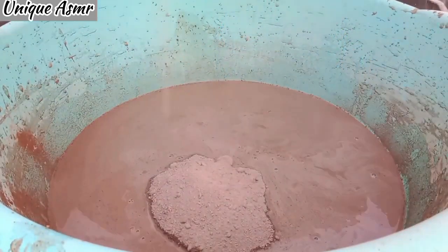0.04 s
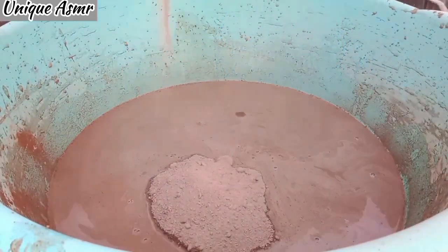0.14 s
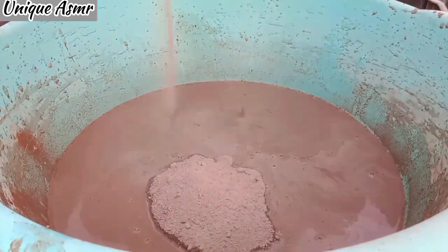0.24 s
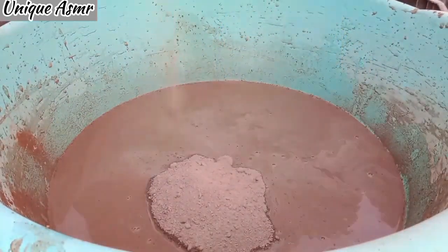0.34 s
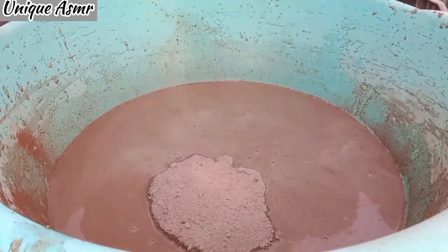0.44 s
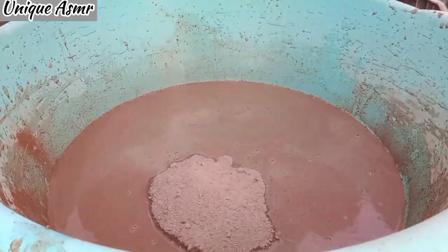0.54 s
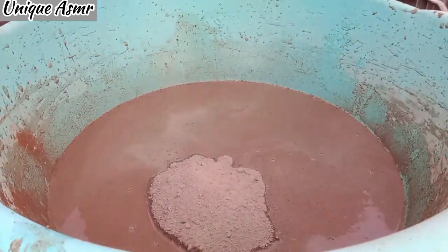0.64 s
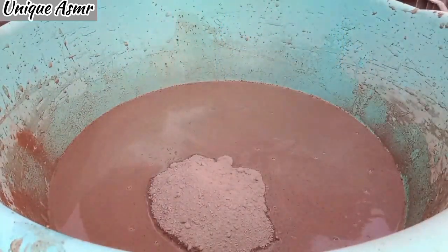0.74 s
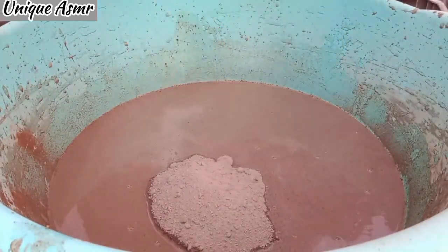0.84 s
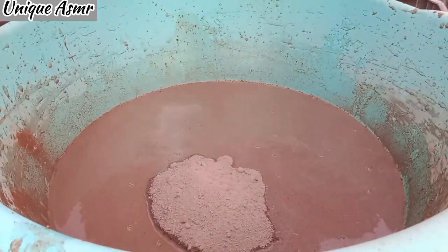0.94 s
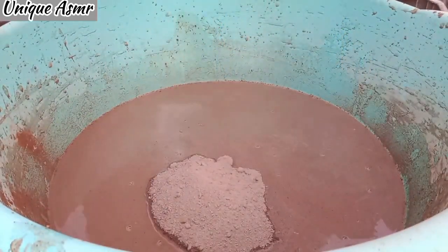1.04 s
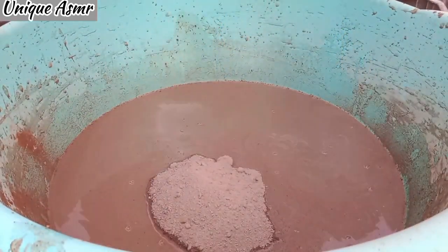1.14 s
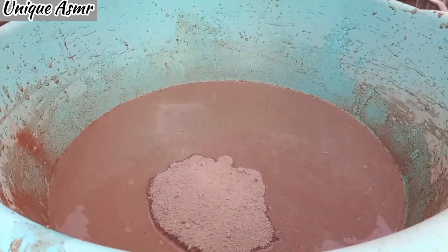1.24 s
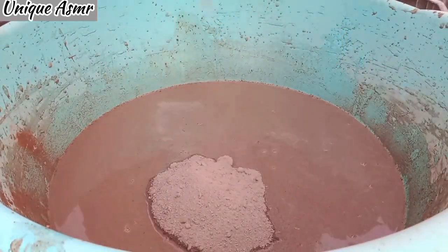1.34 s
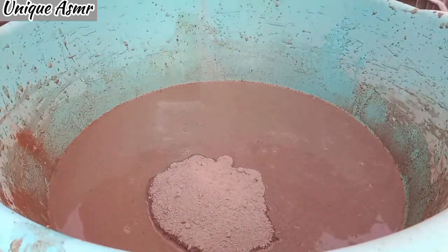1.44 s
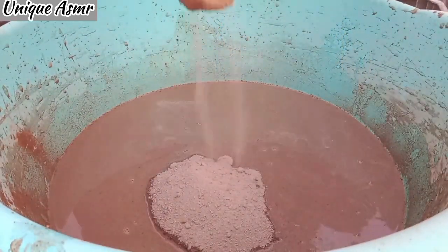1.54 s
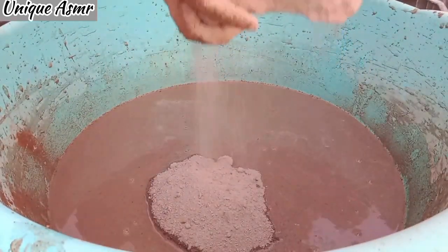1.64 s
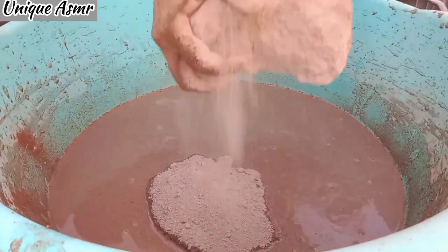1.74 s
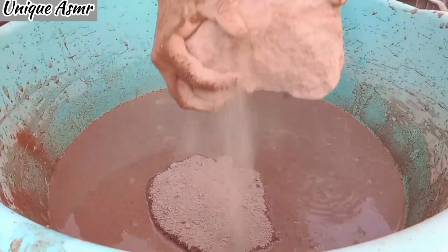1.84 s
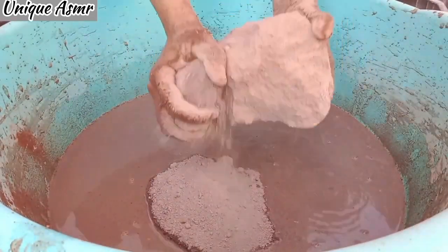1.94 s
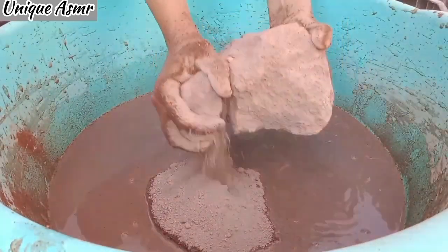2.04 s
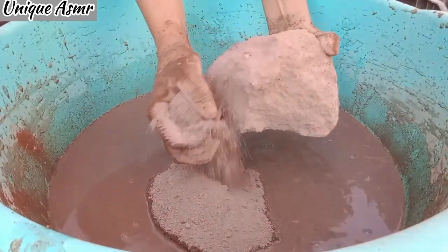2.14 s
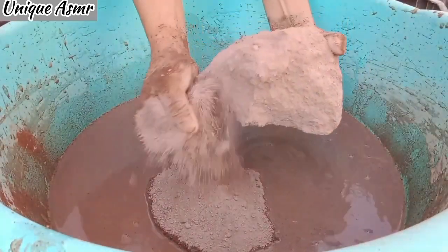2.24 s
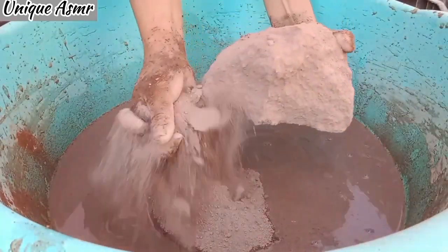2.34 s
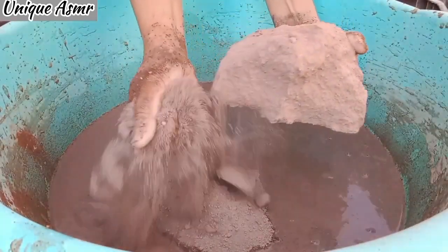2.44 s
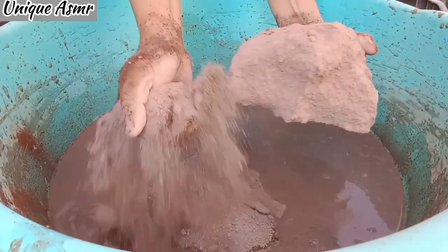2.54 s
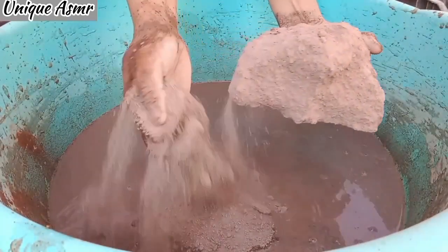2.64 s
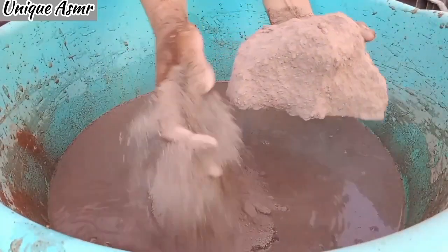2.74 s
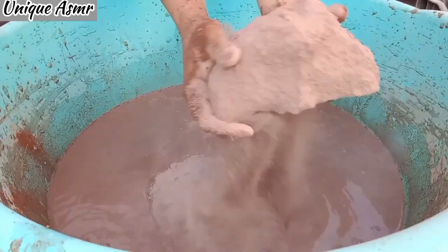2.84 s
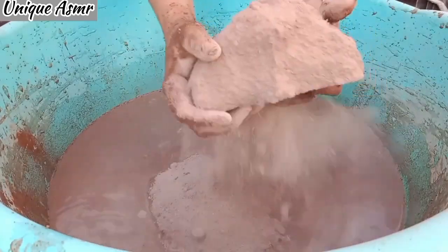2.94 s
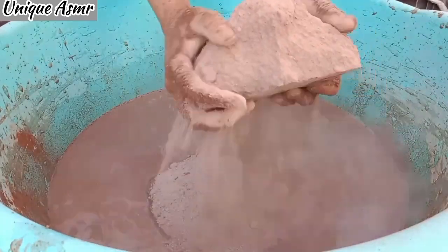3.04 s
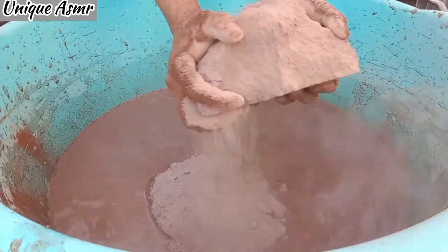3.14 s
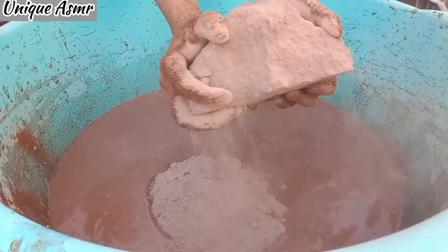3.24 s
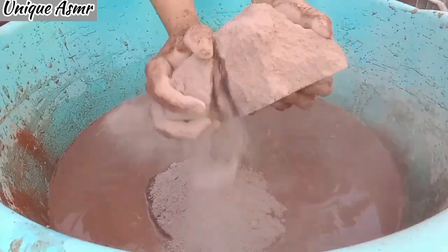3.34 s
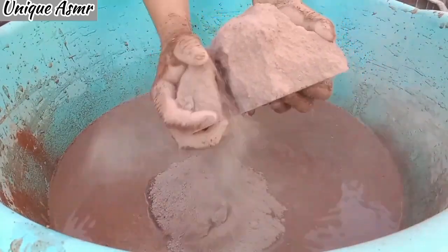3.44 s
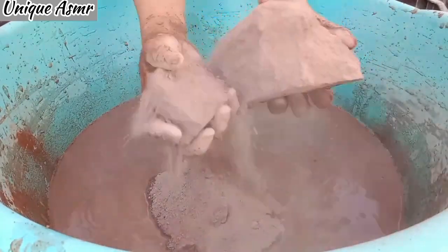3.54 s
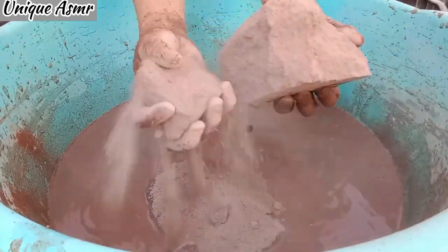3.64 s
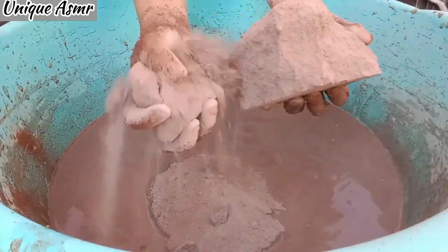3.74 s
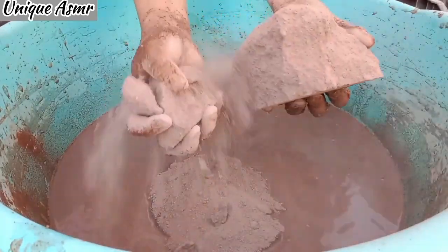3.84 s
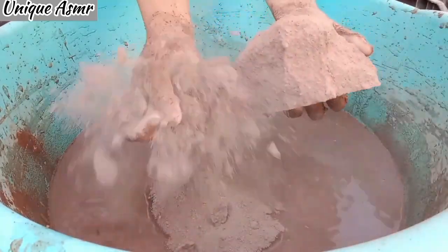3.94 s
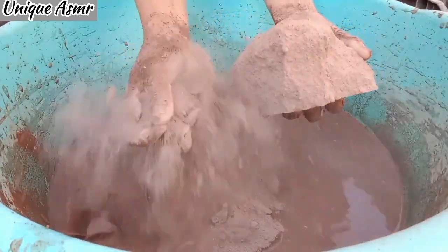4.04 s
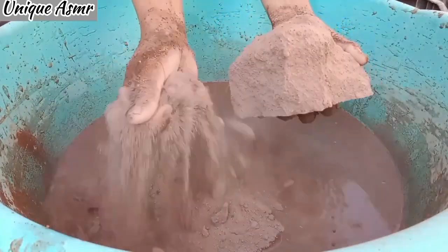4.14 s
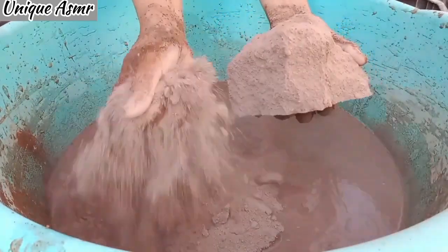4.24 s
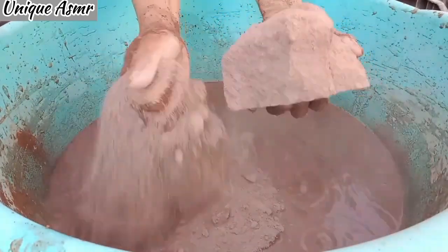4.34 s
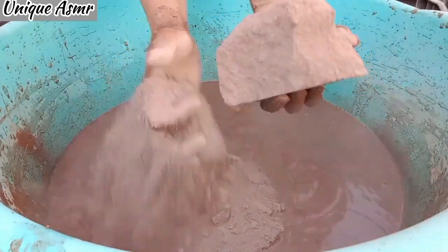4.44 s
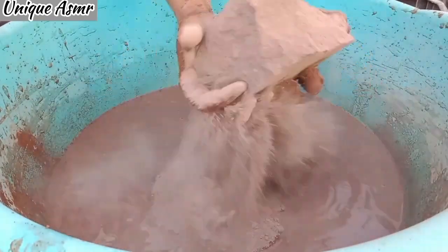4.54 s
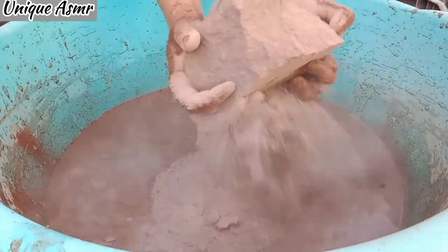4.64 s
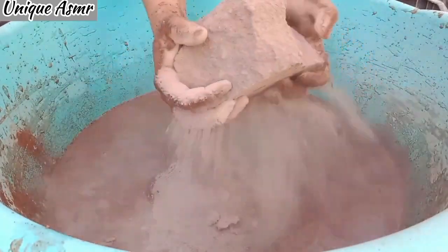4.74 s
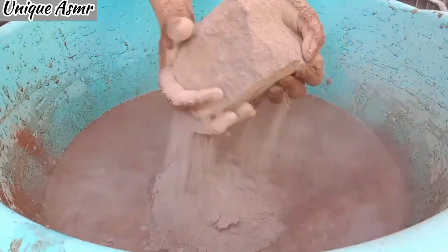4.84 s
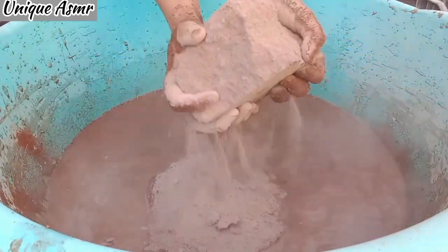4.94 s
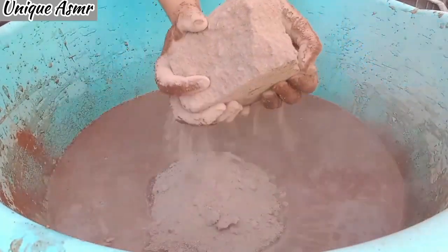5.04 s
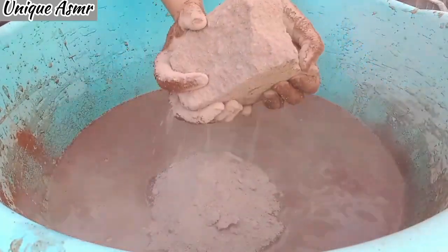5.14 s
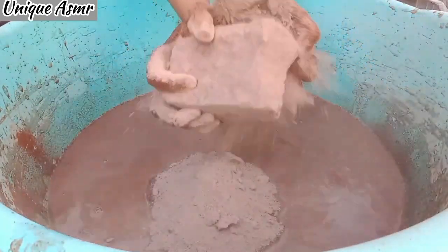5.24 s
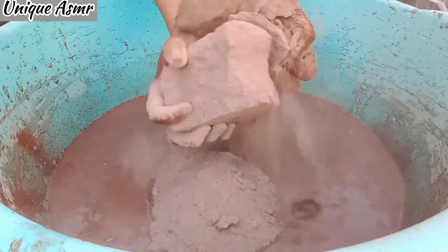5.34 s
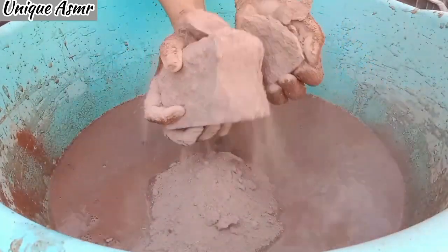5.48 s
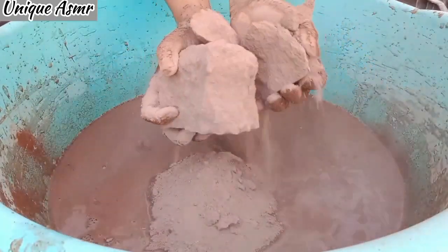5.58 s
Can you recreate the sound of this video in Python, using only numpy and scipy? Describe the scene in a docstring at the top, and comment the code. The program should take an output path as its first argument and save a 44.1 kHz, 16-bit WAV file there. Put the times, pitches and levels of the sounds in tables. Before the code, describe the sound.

Thin sand trickles fizz into water, then a dry block is crumbled by hand in gritty bursts with snaps and plops into a tub.

```python
"""Dry sand crumbled over a tub of water

Two hands crumble a block of dry sand over a plastic tub of muddy water, close to the microphone.
Thin trickles come first, then crunches that die away over a sifting flow: shaped swarms of grain ticks.
Decaying sines and noise cracks make the snapping crusts, plopping lumps, bubbles and thudding clods.
Soft low booms of landing sand, faint wavering tones, hiss and rumble lie underneath."""
import sys
import numpy as np
from scipy import signal
from scipy.fft import rfft, irfft
from scipy.io import wavfile
from scipy.ndimage import uniform_filter1d

SR = 44100
rng = np.random.default_rng(int(sys.argv[2]) if len(sys.argv) > 2 else 0)


def unload_audio(sound):
    """Save the sound as a 16-bit wav file, at the path given as the first command line argument."""
    columns = np.transpose(np.atleast_2d(sound))
    # keep every value between -1 and 1, then stretch to whole-number steps
    steps = np.round(np.clip(columns, -1, 1) * 32767)
    wavfile.write(sys.argv[1], SR, steps.astype(np.int16))


N = 247401
TIME_S = np.arange(N) / SR
FLOW_STEP = 44  # samples between flow curve points
FLOW_TIME_S = TIME_S[::FLOW_STEP]

FLOOR_DB, BOOM_HZ, LOWPASS_HZ = -60, 131.7, 15150
SNAP_T60_S, PLOP_T60_S = 0.0041, 0.022
TRICKLE_FADE_DB_PER_S, CRUNCH_FADE_DB_PER_S = 533, 290
SIFT_COARSE_DB, SIFT_FINE_DB = -5.5, -4

# Background hiss spectrum: (frequency [Hz], relative level [dB])
HISS_SPECTRUM = [(15, -41), (25, -21.5), (128, -1.5), (354, -14), (501, -8), (604, -16), (7090, -30.5),
                 (15000, -46.5)]
# Background rumble spectrum: (frequency [Hz], relative level [dB])
RUMBLE_SPECTRUM = [(20, -24), (70, 9.5), (110, 7.5), (250, -22), (800, -77)]
# Faint tones over the water: (mid time [s], rms at the middle [dB], mean frequency [Hz], half length [s])
WATER_TONES = [(0.172, -36, 1270, 0.051), (0.303, -55, 436, 0.022), (0.405, -38, 2186, .0071),
               (.503, -52.5, 525, 0.061), (.504, -49, 1253, 0.11), (0.693, -54, 976, 0.059),
               (.76, -54, 521, 0.023), (0.812, -52.5, 1652, 0.046), (1.484, -54.5, 1423, 0.051),
               (1.69, -53.5, 1058, 0.098), (1.981, -52, 860, 0.12), (2.55, -51, 787, 0.083),
               (2.765, -51.5, 707, 0.15), (3.08, -52, 418, 0.037), (3.248, -52, 419, 0.077),
               (3.254, -49.5, 2820, .1), (3.886, -51.5, 888, 0.1), (4.211, -46.5, 615, 0.093),
               (4.956, -54, 713, 0.061), (5.375, -43, 2220, 0.035)]
# Clods thudding: (time [s], level [dB], frequency [Hz], t60 [s])
CLOD_THUDS = [(3.2858, -11, 135, 0.088), (3.934, -18, 332, 0.034), (4.361, -43, 241, 0.4),
              (5.215, -20, 117, 0.04)]
# Tub booming under a load of sand: (peak time [s], peak level [dB], rise [s], fall [s])
TUB_BOOMS = [(2.045, -30, 0.036, 0.056), (2.705, -25, 0.018, 0.04), (2.766, -26, 0.0083, 0.012),
             (2.94, -41.5, 0.22, 0.038), (3.635, -29.5, 0.028, 0.021), (3.695, -22, 0.026, 0.043),
             (3.839, -32.5, 0.052, .091), (4.05, -30.5, 0.019, 0.012)]
# Restless low water: (frequency [Hz], relative level [dB])
RESTLESS_SPECTRUM = [(40, -22), (90, -3), (132, 4), (200, -7), (300, -12.5), (700, -94)]
# Level of the restless low water: time [s], level [dB]
RESTLESS_TIMES_S, RESTLESS_DB = [0, 1.2, 2, 4.3, 5.6], [-56, -57.5, -53.5, -52.0, -57.0]
# Dry crusts snapping: (time [s], level before colouring [dB], ring [Hz], relative crack level [dB])
CRUST_SNAPS = [(1.965, -8, 2910, -13), (2.6416, -2.5, 1860, -12.5), (2.6995, -11, 3480, -2.5),
               (2.8950, 2.5, 2230, -5), (2.8975, -1, 3700, -2), (3.0261, 3, 2270, -4.5),
               (3.0509, -3, 2230, -20), (3.0855, -2.5, 1760, -1), (3.1344, -24.5, 2170, 10),
               (4.1482, 3.5, 2170, -14), (4.2544, -13, 3100, 2), (4.4762, -15.5, 1520, -17),
               (4.6898, -14, 4040, -13), (4.716, -8, 3240, -1), (4.79, -20, 2300, 3),
               (4.803, -8, 3080, -10), (4.8074, -8.5, 3900, -18), (5.411, -13, 3240, -2),
               (5.4386, -15, 3740, 8), (5.4557, -11.5, 4000, -2.5), (5.589, -17, 2960, -16)]
# Lumps smacking into water: (time [s], level before colouring [dB], air pocket [Hz], relative crack level [dB])
LUMP_PLOPS = [(.456, -15, 1900, -19), (2.17, -9, 1760, -2), (3.99, -14, 560, -2), (2.5195, -17.5, 805, 5),
              (4.08, -12.5, 1530, -13), (4.099, -6, 940, 8.5), (4.1135, -9, 760, -11),
              (4.1627, -8.5, 1300, -5), (4.1797, -7.5, 2380, -16), (4.18, -2.5, 827, 12),
              (5.0091, -22.5, 2120, -10), (5.499, -6, 1110, -26)]
# Colour of snaps and plops: (frequency [Hz], gain [dB])
IMPACT_COLOUR = [(60, -30), (150, -10), (450, -18.5), (800, -6), (4300, 4.5), (8000, -3.5),
                 (11800, -12.0), (12400, -23), (15000, -36)]
# Colours of the two flows: (frequency [Hz], relative level [dB])
TRICKLE_SPECTRUM = [(200, -14), (1080, -26.5), (1250, -5), (1420, -8.5), (1850, -8), (2400, -4.5),
                    (3400, -5.5), (4700, -11), (6100, -7), (7800, -21), (9500, -32), (15000, -53)]
CRUMBLE_SPECTRUM = [(150, -34), (350, -21), (600, -23.5), (850, -18), (1400, -10.5), (1800, -4.5),
                    (2500, -3), (3800, -5), (4900, -6), (7300, -1.5), (9000, -12), (11800, -23.5),
                    (12400, -32), (15000, -34)]
# Hollow tub resonances: (frequency [Hz], width [Hz], gain [dB])
TUB_RESONANCES = [(846, 36, 8.5), (1224, 40, 16), (1738, 155, 8.5), (2200, 160, 5.5)]
# Unevenness of the bands, greatest in a thin flow: (flow level [dB], depth [dB])
PATCH_DEPTHS = [(-55, 5.2), (-28, 3.2)]
# Weights of the two grain sizes over the spectrum: (frequency [Hz], weight [1])
COARSE_WEIGHT, FINE_WEIGHT = [(1000, 0.87), (1600, 0)], [(3200, 0.02), (6500, 0.86)]
# Weight of the patch depth: (frequency [Hz], weight [1])
PATCH_WEIGHT = [(3000, 1), (8000, .75)]
# Thin streams of sand meeting the water:
# (start [s], rise [s], hold [s], relative flow level [dB], coarse crumbs [dB], fine grains [dB])
TRICKLE_SPILLS = [(0.0, 0.0028, 0.0025, -46, -8, -33), (.114, .045, .035, -30, 2, -5.5),
                  (.262, .015, 0.093, -66.5, 10, 18), (.345, 0.044, 0.062, -41.5, 3, 1),
                  (.449, 0.0092, 0.026, -27.5, -5, -4), (.54, 0.026, 0.007, -58, 5, 0)]
# Block giving way under the fingers:
# (start [s], rise [s], hold [s], relative flow level [dB], coarse crumbs [dB], fine grains [dB])
CRUNCH_SPILLS = [(1.36, 0.033, .01, -65, 15, 15), (1.55, 0.035, 0.038, -45.5, 10, 4),
                 (1.70, 0.023, 0.0089, -43, -2, 5), (1.805, 0.031, 0.019, -47, 7, 2),
                 (1.955, .01, .02, -29.5, 11, -1), (2.085, 0.097, 0.085, -30, -10, -4.5),
                 (2.21, 0.061, 0.049, -32, 9.5, -5), (2.445, 0.015, 0.027, -36, 10.5, 0.5),
                 (2.52, 0.045, .15, -44.5, 14.5, -3), (2.812, 0.023, 0.044, -44.5, -13, 2.5),
                 (2.872, 0.018, 0.0045, -33, 8, 5), (2.935, 0.085, 0.016, -32, -6, 2),
                 (3.01, 0.017, 0.077, -34.5, 11, -0.5), (3.115, 0.0087, 0.028, -35, -9, 0.5),
                 (3.29, 0.029, 0.024, -38.5, -6, 1.5), (3.37, .06, .13, -39, -12, 0),
                 (3.435, .025, .03, -36.5, -8, -5), (3.655, 0.023, .01, -52.5, -13, 8),
                 (3.735, 0.02, 0.0025, -29, 0, 1), (3.775, 0.016, 0.013, -35, 6, -2),
                 (3.885, 0.013, 0.0026, -34.5, -15, 4), (3.926, 0.0047, 0.0034, -27.5, 1, 2),
                 (3.97, 0.016, 0.0034, -26.5, 11.5, -3), (4.04, 0.048, 0.099, -32.5, 16, -8),
                 (4.18, .015, 0.024, -35.5, 14, 1), (4.325, 0.034, 0.028, -34.5, 16, -6.5),
                 (4.472, 0.0083, 0.076, -46.5, 4, -26), (4.568, 0.024, 0.0053, -33.5, -6, 1),
                 (4.675, 0.033, 0.028, -31.5, 0.5, -1.5), (4.78, 0.028, 0.052, -38, 2.5, -8),
                 (4.862, 0.032, 0.01, -31, -3, -2.5), (5.0, 0.026, 0.0093, -41, -11, -10.5),
                 (5.22, 0.028, .02, -32.5, 1, 0), (5.255, 0.017, .01, -26.5, 4, -5),
                 (5.365, 0.039, 0.1, -40, 2.5, -7.5)]
# Loose sand sifting between crunches: (time [s], relative flow level [dB])
SIFTING = [(1.2, -72.5), (1.55, -57), (1.9, -49), (2.08, -65), (2.4, -47), (2.779, -65), (3.2, -45.5),
           (3.65, -70.5), (4.25, -36.5), (4.46, -59), (4.65, -45), (4.97, -54.5), (5.19, -69),
           (5.36, -55.5), (5.6, -45)]


def gain_of(db):
    """Decibels to amplitude factor."""
    return 10 ** (np.asarray(db) / 20)


def evened(x):
    """Scales to rms 1."""
    return x / np.sqrt(np.mean(x ** 2) + 1e-20)


def read(points, hz):
    """Interpolates a spectrum table on a log-frequency axis."""
    table_hz, value = np.transpose(points)
    return np.interp(np.log(hz + 1), np.log(table_hz + 1), value)


def add(mix, start_s, sound):
    """Mixes a sound in at start_s."""
    part = mix[max(round(start_s * SR), 0):][:len(sound)]
    part += sound[:len(part)]


def coloured(x, points):
    """Filters x by a spectrum table."""
    hz = np.fft.rfftfreq(len(x), 1 / SR)
    return irfft(rfft(x) * gain_of(read(points, hz)), len(x))


def wander(rate_hz):
    """Noise with a Gaussian low-pass, rms 1."""
    hz = np.fft.rfftfreq(N, 1 / SR)
    lowpass = np.exp(-(hz / rate_hz) ** 2)
    return evened(irfft(rfft(rng.standard_normal(N)) * lowpass, N))


def walls(x, echo_db, t60_s, count=40):
    """Random early echoes between the water and the tub's wall, quickly dying away."""
    delay_s = rng.uniform(.0015, .03, count)
    taps = np.zeros(SR // 20)
    taps[(delay_s * SR).astype(int)] = rng.choice([-1, 1], count) * gain_of(-60 * delay_s / t60_s)
    taps /= np.linalg.norm(taps)
    return x + gain_of(echo_db) * signal.oaconvolve(x, taps)[:N]


def background():
    """Faint shaped hiss, and a low rumble that swells twice early on."""
    hiss = evened(coloured(rng.standard_normal(N), HISS_SPECTRUM))
    rumble = evened(coloured(rng.standard_normal(N), RUMBLE_SPECTRUM))
    swell = np.exp(-((TIME_S - .18) / 0.043) ** 2) + np.exp(-((TIME_S - 1.5) / 0.16) ** 2)
    return gain_of(FLOOR_DB) * hiss + gain_of(-45.0) * swell * rumble


def tones():
    """Breathy sines: wavering pitch, noise-modulated phase and level, smooth swell and fade."""
    clock_s = np.cumsum(1 + .013 * wander(40)) / SR
    fuzz = .78 + .45 * (wander(60) + 1j * wander(60))
    out = np.zeros(N)
    for middle_s, db, hz, half_s in WATER_TONES:
        swell = gain_of(db) * np.exp(-np.abs((TIME_S - middle_s) / half_s) ** 3)
        tone = (fuzz * np.exp(2j * np.pi * hz * clock_s)).real
        out += swell * np.sqrt(2) * tone
    return out


def thuds(onset_s=0.0044, overtone_ratio=1.63, overtone_db=-4):
    """A soft clod knocks the tub: a low mode and an overtone decaying twice as fast."""
    t_s, out = np.arange(SR // 4) / SR, np.zeros(N)
    onset = 1 - np.exp(-(t_s / onset_s) ** 2)
    for start_s, db, hz, t60_s in CLOD_THUDS:
        fade = gain_of(-60 * t_s / t60_s)
        mode = fade * np.sin(2 * np.pi * hz * t_s)
        overtone = fade ** 2 * np.sin(2 * np.pi * hz * overtone_ratio * t_s)
        add(out, start_s, gain_of(db) * (mode + gain_of(overtone_db) * overtone) * onset)
    return out


def booms(overtone_ratio=1.5, overtone_db=-17):
    """Landing sand sways water and tub floor in low modes, over a restless low noise."""
    turns = np.cumsum(BOOM_HZ * (1 + .06 * wander(35))) / SR
    swell = np.zeros(N)
    for peak_s, db, rise_s, fall_s in TUB_BOOMS:
        width_s = np.where(TIME_S < peak_s, rise_s, fall_s)
        swell += gain_of(db) * np.exp(-((TIME_S - peak_s) / width_s) ** 2)
    overtone = wander(15) * np.sin(2 * np.pi * overtone_ratio * turns)
    ring = np.sin(2 * np.pi * turns) + gain_of(overtone_db) * overtone
    stirring = gain_of(np.interp(TIME_S, RESTLESS_TIMES_S, RESTLESS_DB))
    restless = evened(coloured(rng.standard_normal(N), RESTLESS_SPECTRUM))
    return swell * ring + stirring * restless


def snaps_and_plops(crack_s=0.0017, onset_s=0.00057):
    """Each break or smack: a short noise crack plus the ring of a crumb or trapped air pocket."""
    t_s, out = np.arange(2048) / SR, np.zeros(N)
    onset = 1 - np.exp(-t_s / onset_s)
    for rows, t60_s in (CRUST_SNAPS, SNAP_T60_S), (LUMP_PLOPS, PLOP_T60_S):
        for start_s, db, hz, crack_db in rows:
            ring = np.sin(2 * np.pi * hz * t_s) * gain_of(-60 * t_s / t60_s)
            crack = gain_of(crack_db - 7.5) * rng.standard_normal(len(t_s)) * np.exp(-t_s / crack_s)
            add(out, start_s, gain_of(db) * (ring + crack) * onset)
    return walls(coloured(out, IMPACT_COLOUR), echo_db=-12.5, t60_s=0.087)


def swells(rows, fade_db_per_s):
    """Each spill rises, holds and dies away; yields amplitude over time and grain mix [dB]."""
    for start_s, rise_s, hold_s, db, coarse_db, fine_db in rows:
        age_s = FLOW_TIME_S - start_s
        opening = np.sin(np.pi / 2 * np.clip(age_s / rise_s, 0, 1)) ** 2
        fade_db = fade_db_per_s * np.maximum(age_s - rise_s - hold_s, 0)
        yield opening * gain_of(db - fade_db), coarse_db, fine_db


def together(spills):
    """Adds spills in power; returns (time [s], flow [dB], coarse crumbs [dB], fine grains [dB])."""
    power = sum(np.outer(gain_of([0, coarse_db, fine_db]), level) ** 2
                for level, coarse_db, fine_db in spills)
    flow_db, coarse_db, fine_db = 10 * np.log10(power + 1e-12)
    return FLOW_TIME_S, flow_db, coarse_db - flow_db, fine_db - flow_db


def falling_sand():
    """All that leaves the hands once crumbling starts: crunches plus sifting."""
    sift_s, sift_db = np.transpose(SIFTING)
    sifting = gain_of(np.interp(FLOW_TIME_S, sift_s, sift_db)) * (FLOW_TIME_S >= sift_s[0])
    crunches = swells(CRUNCH_SPILLS, CRUNCH_FADE_DB_PER_S)
    return together([*crunches, (sifting, SIFT_COARSE_DB, SIFT_FINE_DB)])


def bubbles(size_db=-9, decay_cycles=5, pitch_rise=0.017, count=380):
    """Crumbs drag down air pockets: rising, decaying sines whose level follows flow and coarseness."""
    flow_s, flow_db, coarse_db, _ = falling_sand()
    t_s, out = np.arange(SR // 10) / SR, np.zeros(N)
    for when, pitch, size in rng.random((count, 3)):
        start_s, hz = when * flow_s[-1], 480 * 7 ** pitch
        age = t_s * hz / decay_cycles
        sand_db = np.interp(start_s, flow_s, flow_db + (1 - pitch) * coarse_db)
        db = size_db + sand_db + 8 * pitch - 12 * size
        ring = np.sin(2 * np.pi * hz * t_s * (1 + pitch_rise * age / 2))
        add(out, start_s, gain_of(db) * ring * np.exp(-age) * (1 - np.exp(-10 * age)))
    return out


def grains(per_s, spread_db, decay_cycles, dust_db, count=48):
    """Ticks of random size in log-spaced pitch bands, over the even hiss of dust."""
    t_s, out = np.arange(600) / SR, np.zeros(N)
    for hz in np.geomspace(450, 13000, count):
        # small, high-pitched grains outnumber large ones; per_s is the nominal rate
        number = int(per_s * N / SR * np.sqrt(hz / 3000) / count)
        at, size, sign = rng.random((number, 3)).T
        size_db = spread_db * np.minimum(-np.log(size), 3.5)
        hits = np.bincount((at * N).astype(int), np.sign(sign - .5) * gain_of(size_db), N)
        tick = np.sin(2 * np.pi * hz * t_s) * np.exp(-t_s * hz / decay_cycles)
        out += np.sqrt(hz) * evened(signal.oaconvolve(hits, tick)[:N])
    return evened(evened(out) + gain_of(dust_db) * rng.standard_normal(N))


def flow(texture, colour, flow_s, flow_db, coarse_db, fine_db, clump_db):
    """Grains coloured by tub and grain mix, arriving in clumps as the flow swells."""
    hz, t_s, z = signal.stft(texture, SR, nperseg=1024, noverlap=768)
    tub_db = sum(db / (1 + (2 * (hz - f) / width) ** 2) for f, width, db in TUB_RESONANCES)
    shape = gain_of(read(colour, hz) + tub_db)
    body = (hz > 1300) & (hz < 5000)  # level reference
    shape /= np.sqrt(np.sum(shape[body] ** 2) / len(hz))
    coarse = np.outer(read(COARSE_WEIGHT, hz), np.interp(t_s, flow_s, coarse_db))
    fine = np.outer(read(FINE_WEIGHT, hz), np.interp(t_s, flow_s, fine_db))
    # the hollow of the hand keeps changing shape: narrow bands come and go, loudness holds
    blur = np.outer(np.hanning(10), np.hanning(26))
    patches = evened(signal.fftconvolve(rng.standard_normal(z.shape), blur, "same"))
    depth_db = np.interp(np.interp(t_s, flow_s, flow_db), *np.transpose(PATCH_DEPTHS))
    patches = gain_of(np.outer(read(PATCH_WEIGHT, hz), depth_db) * patches)
    patches /= np.sqrt(uniform_filter1d(patches ** 2, size=45, axis=0))
    z = z * shape[:, None] * gain_of(coarse + fine) * patches
    level = gain_of(np.interp(TIME_S, flow_s, flow_db) + clump_db * wander(43))
    return signal.istft(z, nperseg=1024, noverlap=768)[1][:N] * level


def trickle():
    """Fine sand fizzes into the water as a swarm of tiny ringing bubbles."""
    texture = grains(per_s=6000, spread_db=2, decay_cycles=8, dust_db=-3)
    spills = together(swells(TRICKLE_SPILLS, TRICKLE_FADE_DB_PER_S))
    return gain_of(-2.5) * flow(texture, TRICKLE_SPECTRUM, *spills, clump_db=1.5)


def crumble():
    """The block gives way grain by grain: short ticks, echoed by the tub."""
    texture = grains(per_s=6000, spread_db=4.3, decay_cycles=2.5, dust_db=-6)
    texture = evened(walls(texture, echo_db=-6.0, t60_s=0.027))
    return gain_of(-1.0) * flow(texture, CRUMBLE_SPECTRUM, *falling_sand(), clump_db=1.0)


def scene():
    """All sources at one microphone."""
    surroundings = background() + tones()
    tub = thuds() + booms()
    sand = snaps_and_plops() + bubbles() + trickle() + crumble()
    return (surroundings + tub + sand)[None]


def record(dry):
    """Soft overload rounds the loudest smacks; a low-pass then limits the band."""
    ceiling = .95
    rounded = ceiling * np.tanh(dry / ceiling)
    lowpass = signal.firwin(511, LOWPASS_HZ, window=("kaiser", 9), fs=SR)
    return signal.oaconvolve(rounded, lowpass[None], "same")


dry = scene()
out = record(dry)
unload_audio(out)
```